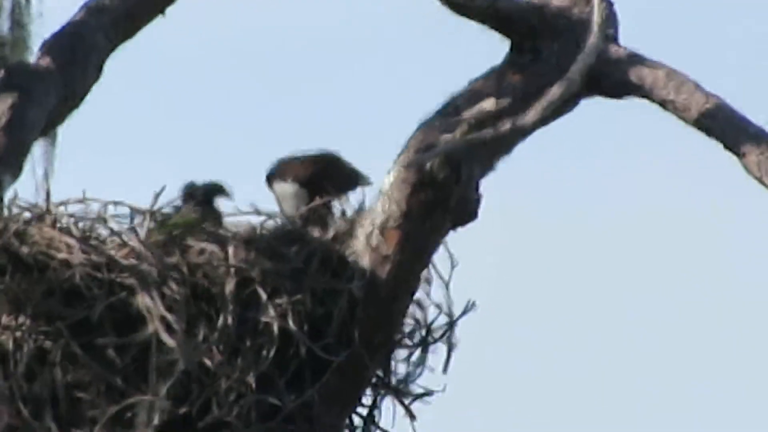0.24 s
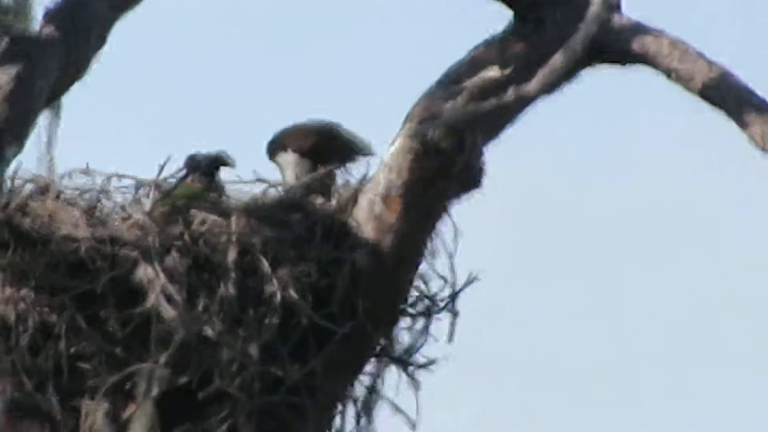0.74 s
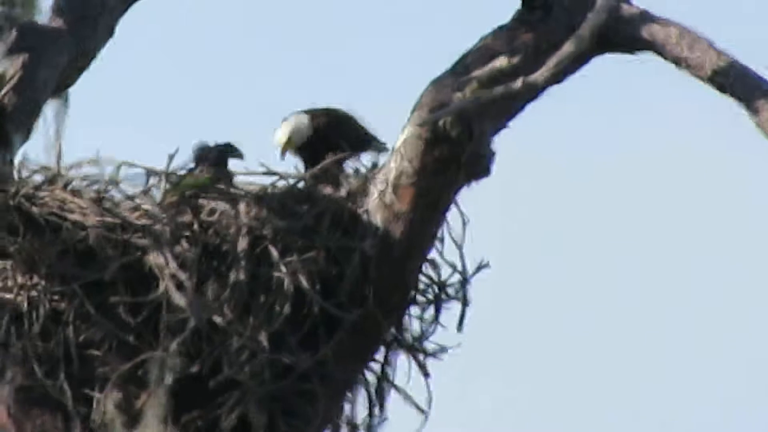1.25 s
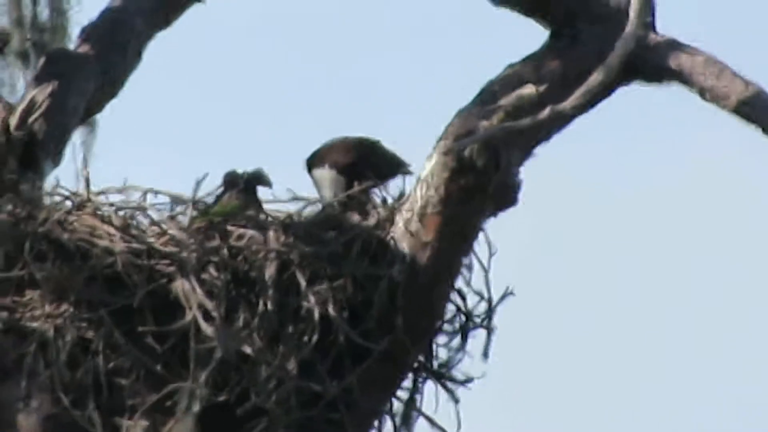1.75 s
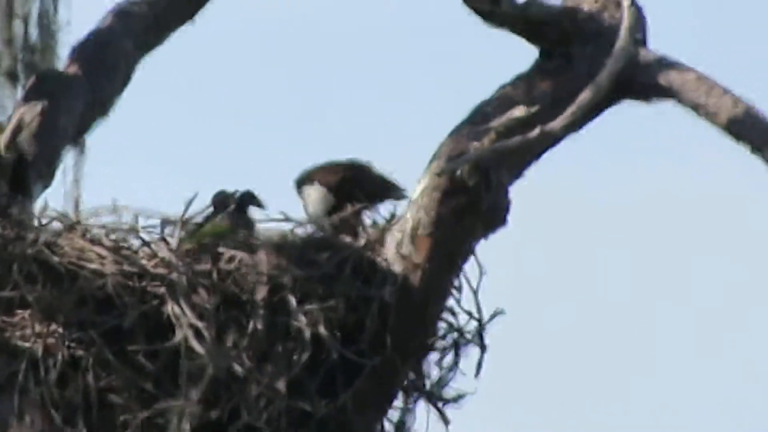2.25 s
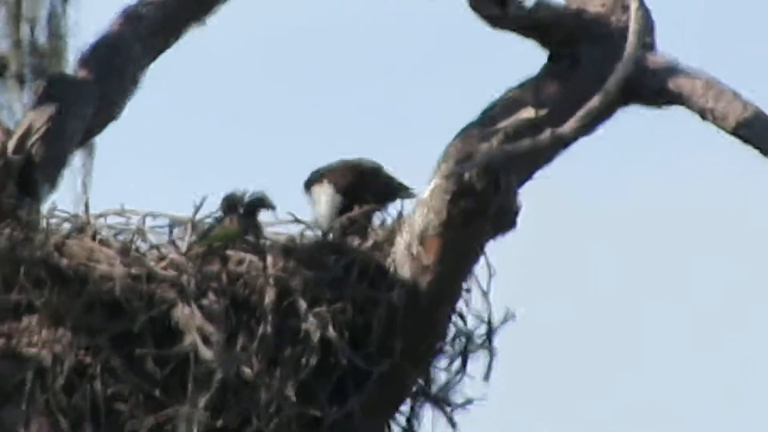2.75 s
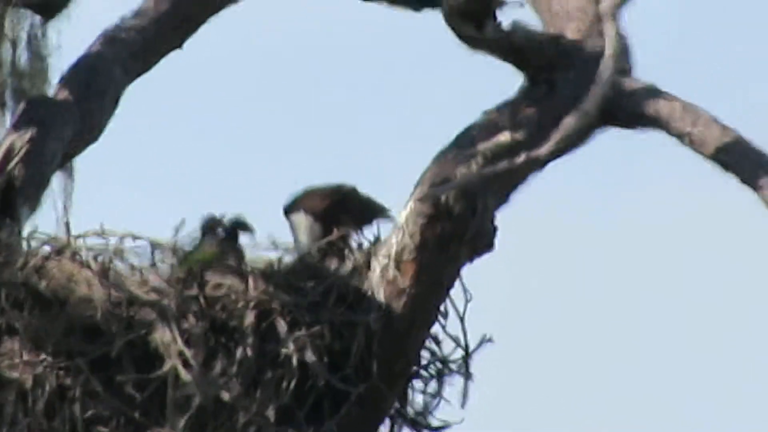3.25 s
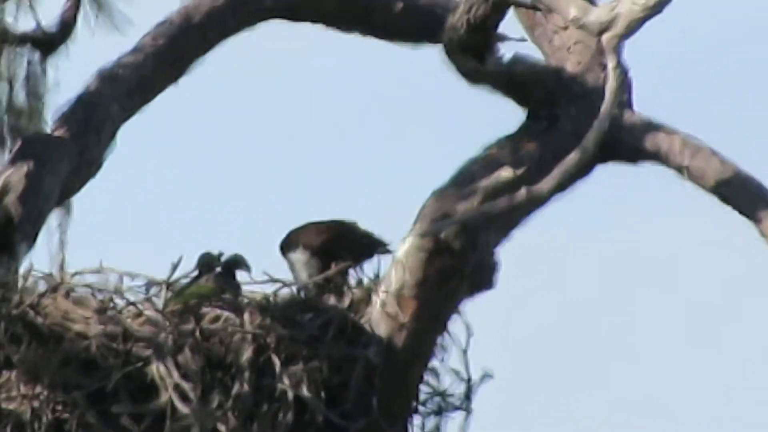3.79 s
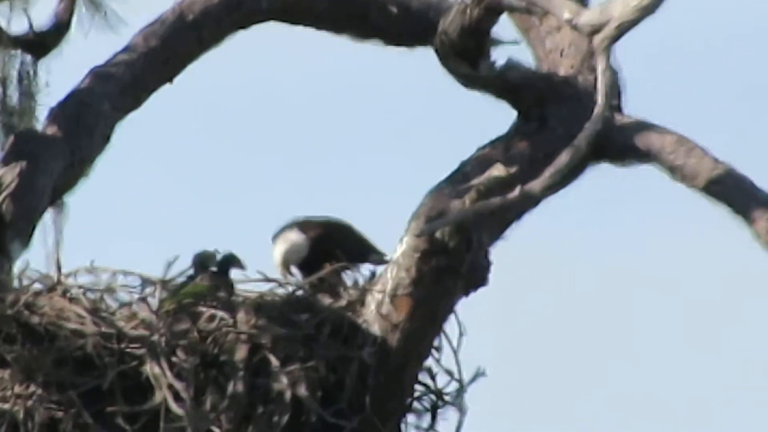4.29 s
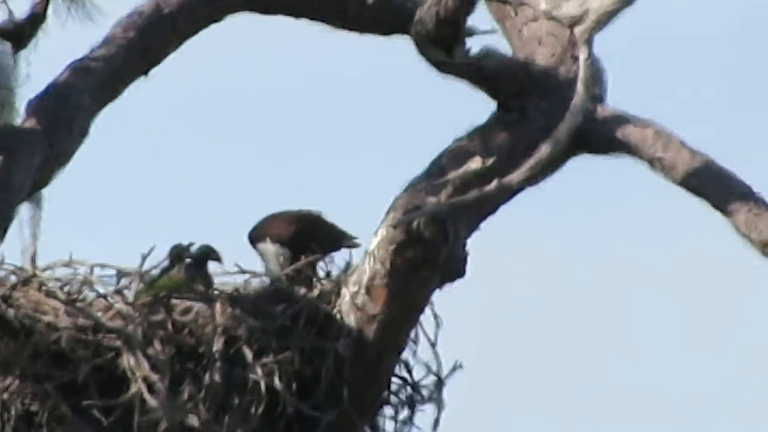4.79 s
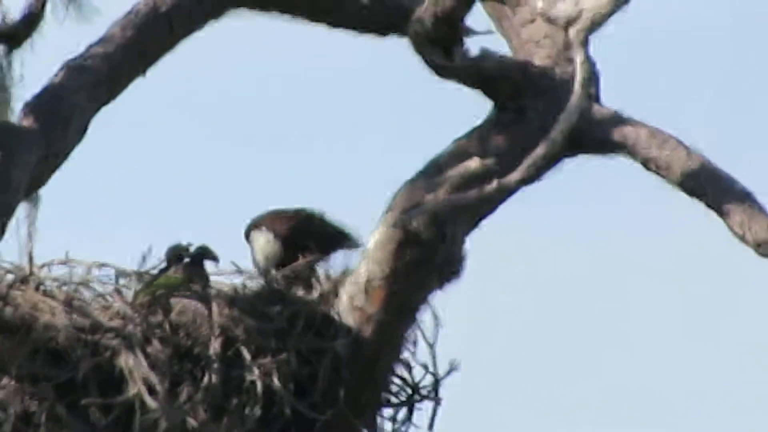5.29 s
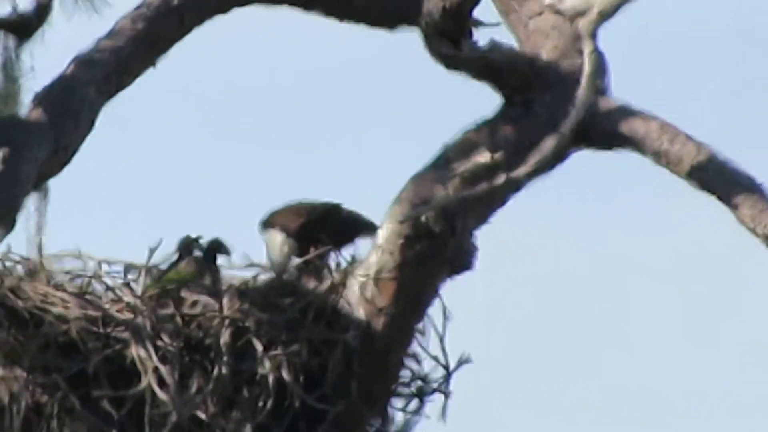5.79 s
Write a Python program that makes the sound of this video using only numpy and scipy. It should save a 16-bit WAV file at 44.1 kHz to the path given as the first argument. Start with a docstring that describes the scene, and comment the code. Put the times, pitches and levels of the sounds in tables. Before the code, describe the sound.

A bald eagle calls from its nest high in a tree, giving five short, high chittering notes, then two more after a pause. Each note cracks in sharply and drops to a soft, hoarse whimper, with a light echo from the trees. The calls sit to the right. Underneath run a far low rumble, a steady whirr, a very faint insect trill and microphone hiss.

```python
"""A bald eagle gives seven short chittering notes at its nest high in a tree, five and then two.
Each note cracks in, arches near 1.5 kHz with a strong overtone an octave up, and drops to a soft,
hoarse whimper. The bird's voice box makes the tone, its throat shapes it, and the trees scatter it back.
Under it lie a far low rumble, a steady whirr with a few ringing tones, a faint insect trill,
one tick and microphone hiss."""
import sys
import numpy as np
from scipy import signal
from scipy.fft import rfft, irfft, next_fast_len
from scipy.io import wavfile

SR = 44100
rng = np.random.default_rng(int(sys.argv[2]) if len(sys.argv) > 2 else 0)


def generate_wav(sig):
    """Save sig (samples, or channels by samples) to the path in sys.argv[1] as 16-bit PCM at SR."""
    pcm = np.round(np.clip(np.atleast_2d(sig).T, -1, 1) * 32767).astype(np.int16)
    wavfile.write(sys.argv[1], SR, pcm)


N = 265923


def gain_of(db):
    """Turns decibels into a number to multiply by."""
    return 10 ** (np.asarray(db) / 20)


def evened(x):
    """Scales a signal so its average strength (rms) is 1."""
    return x / np.sqrt(np.mean(x ** 2) + 1e-20)


def curve_at(points, hz):
    """Joins a table's points with lines, octaves evenly spaced, and looks up the value at hz."""
    point_hz, value = np.transpose(points)
    return np.interp(np.log(hz + 1), np.log(point_hz + 1), value)


def add(mix, start_s, sound):
    """Adds a sound into the mix at the given time."""
    part = mix[round(start_s * SR):][:len(sound)]
    part += sound[:len(part)]


def wander(size, rate_hz):
    """A smooth random wobble of strength about 1, no faster than about rate_hz."""
    span = next_fast_len(max(size, SR))
    hz = np.fft.rfftfreq(span, 1 / SR)
    slow = rfft(rng.standard_normal(span)) / (1 + (hz / rate_hz) ** 4)
    return evened(irfft(slow, span))[:size]


# How wide the noise sounds. Each row: frequency in Hz, unshared part over shared part in dB.
STEREO_WIDTH = [(60, -18), (92, -8), (140, -0.5), (210, 4), (330, 7.5), (500, 3.5), (760, -7), (1160, 1),
                (1760, 1.5), (2690, 2.5), (4100, 0.5), (6260, 0.5), (9560, 2.5), (14600, -4)]

def stereo_noise(shape, lean_db):
    """Noise with the given tone colour, partly shared by both ears; positive lean_db moves it left."""
    hz = np.fft.rfftfreq(N, 1 / SR)
    shared, side = rfft(rng.standard_normal((2, N)))
    width = gain_of(curve_at(STEREO_WIDTH, hz))
    left = (shared + width * side) * gain_of(lean_db / 2)
    right = (shared - width * side) * gain_of(-lean_db / 2)
    return evened(irfft(np.array([left, right]) * shape / np.sqrt(1 + width ** 2), N))


# The tone colours of three steady noises. Each row: frequency in Hz, relative level in dB.
RUMBLE_COLOUR = [(15, -6), (30, -14.5), (45, -6.5), (65, -3), (85, -6), (115, -4.5), (160, -11.5),
                 (250, -12), (400, -17), (1000, -25), (3000, -57)]
WHIRR_COLOUR = [(200, -9.5), (400, -11.5), (560, 0), (780, -6.5), (1050, -8), (1500, -9), (2100, -14),
                (3200, -19.5), (5000, -33)]
HISS_COLOUR = [(500, -8), (3000, 4), (4500, 0.5), (7500, 0), (9500, -3.5), (11500, -8.5), (13000, -15),
               (14300, -41), (15000, -50)]
# Which way they lean. Each row: frequency in Hz, left over right in dB.
NOISE_LEAN = [(60, -3), (110, -1.5), (200, -1.5), (370, -1), (690, 0.5), (1270, -0.5), (2340, -0.5),
              (4300, -0.5), (7920, 0.5), (14600, -0.5)]

def background(rumble_db=-42, whirr_db=-50, hiss_db=-55, sway_db=0.6, sway_hz=3):
    """A far rumble that sways gently in level, the broad part of the whirr, and microphone hiss."""
    hz = np.fft.rfftfreq(N, 1 / SR)
    lean_db = curve_at(NOISE_LEAN, hz)
    rumble_gain = gain_of(rumble_db + sway_db * wander(N, sway_hz))
    rumble = rumble_gain * stereo_noise(gain_of(curve_at(RUMBLE_COLOUR, hz)), lean_db)
    whirr = gain_of(whirr_db) * stereo_noise(gain_of(curve_at(WHIRR_COLOUR, hz)), lean_db)
    hiss = gain_of(hiss_db) * stereo_noise(gain_of(curve_at(HISS_COLOUR, hz)), lean_db)
    return rumble + whirr + hiss


# Tones that ring in the whirr and hiss. Each row: pitch in Hz, half width in Hz, level in dB,
# left over right in dB, how strongly it follows the swells (0 is not at all).
RINGING_TONES = [(79.7, 21.4, -51.5, 5, 0), (593.4, 21, -56.5, -1.5, 0.76), (796, 53, -52, -6.5, 0),
                 (825, 16.7, -56, -7.5, 1.9), (962.5, 3.3, -61, 2, 0.98), (1116, 42, -60.5, 2, 0),
                 (2860, 56, -72.5, -2, 0.43), (14400, 120, -91, 2, 0)]
# Brief swells of the whirr. Each row: time in seconds, rise in dB for a tone that follows at 1.
WHIRR_SWELLS = [(.25, 3.5), (1.96, 5.5), (2.12, 3), (3.33, 5.5), (4.57, 7.5), (5.17, 4.5), (5.64, 5)]

def ringing_tones(waver_db=-0.75, waver_hz=3, swell_half_s=0.029):
    """Narrow resonances give the whirr its fuzzy, wavering tones."""
    t, hz = np.arange(N) / SR, np.fft.rfftfreq(N, 1 / SR)
    swell_db = sum(rise_db * np.exp(-((t - at_s) / swell_half_s) ** 2) for at_s, rise_db in WHIRR_SWELLS)
    swell_db -= swell_db.mean()
    out = np.zeros((2, N))
    for centre_hz, half_width_hz, db, lean_db, follow in RINGING_TONES:
        band = 1 / (1 + ((hz - centre_hz) / half_width_hz) ** 2)
        level_db = db + follow * swell_db + waver_db * wander(N, waver_hz)
        out += gain_of(level_db) * stereo_noise(band, lean_db)
    return out


# A far insect's bursts of song. Each row: start in seconds, length in seconds.
INSECT_BURSTS = [(0, .4), (.64, .86), (1.98, 0.64), (3.02, .62), (4.04, 0.6), (5.02, .65)]

def insect(centre_hz=8780, half_width_hz=300, level_db=-68, stroke_hz=49.7, fade_s=0.1):
    """A faint, high trill on the left that pulses with every stroke of the wings."""
    t, hz = np.arange(N) / SR, np.fft.rfftfreq(N, 1 / SR)
    bursts = sum(np.clip(np.minimum(t - start, start + length - t) / fade_s + 0.5, 0, 1)
                 for start, length in INSECT_BURSTS)
    strokes = evened(np.exp(np.cos(2 * np.pi * stroke_hz * t)))
    band = 1 / (1 + ((hz - centre_hz) / half_width_hz) ** 2)
    return gain_of(level_db) * bursts * strokes * stereo_noise(band, lean_db=6)


def tick(start_s=0.757, burst_db=-41, decay_s=0.0006, low_cut_hz=7000):
    """One faint, dry tick: a tiny burst of noise with only its treble kept."""
    t = np.arange(0, 10 * decay_s, 1 / SR)
    out = np.zeros(N)
    add(out, start_s, gain_of(burst_db) * rng.standard_normal(len(t)) * np.exp(-t / decay_s))
    return signal.lfilter(*signal.butter(2, low_cut_hz, "high", fs=SR), out)


# Echoes off nearby limbs and the ground. Each row: delay in seconds, left gain, right gain.
NEAR_ECHOES = [(0.0125, 0.2, 0.28), (0.023, 0.18, 0.047), (.033, -.07, .08), (.056, 0.044, 0.11)]

def trees(sound, die_away_s=0.96, scatter_db=-12, rise_s=0.0042, dull_hz=3400, echoes_per_s=2500):
    """A few near echoes and a thin scatter from the trees, whose leaves soak up treble."""
    t = np.arange(SR) / SR
    echoes = rng.standard_normal((2, SR)) * (rng.random((2, SR)) < echoes_per_s / SR)
    echoes *= gain_of(-60 * t / die_away_s) * (1 - np.exp(-t / rise_s))
    echoes *= gain_of(scatter_db) / np.linalg.norm(echoes, axis=1, keepdims=True)
    echoes = signal.lfilter(*signal.butter(2, dull_hz, fs=SR), echoes)
    for delay_s, left, right in NEAR_ECHOES:
        echoes[:, round(delay_s * SR)] += left, right
    return signal.fftconvolve(sound[None], echoes, axes=1)[:, :N]


def step(x):
    """A smooth step from 0 to 1 around x = 0."""
    return 0.5 + 0.5 * np.tanh(x / 2)


LEAD_S, RISE_DB, FALL_S = 0.02, 20.5, 0.014  # a note swells up to its peak, then dies away
CRACK_ROUGH, CLIMB_HZ_PER_S, SNAP_S = 0.78, 14300, 0.001  # it starts hoarse, climbs, snaps to its pitch
ARCH_AT_S, ARCH_HALF_S = 0.0051, 0.0058  # the pitch arches just after the peak
DROP_S = 0.0026  # how quickly the voice drops to the whimper
WHIMPER_ROUGH, SAG_HZ_PER_S, RELEASE_S = 0.58, 2100, 0.031  # the whimper is hoarse, sags and fades

def note_shape(pitch_hz, peak_db, body_rough, crack_hz, crack_s, arch,
               drop_s, whimper_hz, whimper_db, end_s):
    """Time from the peak, pitch, level and roughness as a note cracks in, arches and drops."""
    t = np.arange(-LEAD_S, end_s, 1 / SR)
    in_crack = step(-(t + crack_s) / SNAP_S)
    in_whimper = step((t - drop_s) / DROP_S)
    hz = pitch_hz * (1 + arch * np.exp(-((t - ARCH_AT_S) / ARCH_HALF_S) ** 2))
    hz += in_crack * (crack_hz + CLIMB_HZ_PER_S * (t + crack_s) - hz)
    hz += in_whimper * (whimper_hz - SAG_HZ_PER_S * (t - (drop_s + end_s) / 2) - hz)
    rise = gain_of(-RISE_DB * (t / LEAD_S) ** 2)
    fall = np.exp(-(t / FALL_S) ** 2)
    cry = gain_of(peak_db) * np.where(t < 0, rise, fall)
    whimper = gain_of(whimper_db) * in_whimper * np.minimum((end_s - t) / RELEASE_S, 1)
    rough = body_rough + (CRACK_ROUGH - body_rough) * in_crack + (WHIMPER_ROUGH - body_rough) * in_whimper
    return t, hz, 20 * np.log10(cry + whimper + 1e-9), np.clip(rough, 0, 1)


# How the throat and beak colour the voice. Each row: frequency in Hz, boost or cut in dB.
THROAT_COLOUR = [(800, -28), (1100, 5.5), (1500, -10), (2000, 18), (2450, -7), (2900, 2.5), (3400, 10),
                 (4350, -9.5), (5000, -10.5), (5900, -19.5), (7400, -25.5), (9000, -35), (13000, -34)]
# The airy rasp in the rough parts. Each row: frequency in Hz, relative level in dB.
RASP_COLOUR = [(600, -55), (1200, 6), (2200, -6.5), (3000, 5), (4300, -4.5), (5500, -15), (7300, -11),
               (12000, -42)]

def eagle_note(row, jitter=0.087, jitter_hz=500, flutter=0.68, flutter_hz=450,
               press_s=0.066, firm_db=-35, mellow=1.6):
    """The voice box sings a tone with overtones through the throat; roughness shakes it and adds rasp."""
    pitch_hz, peak_db, body_rough, crack_hz, crack_s, arch, press_db, *whimper = row
    t, hz, level_db, rough = note_shape(pitch_hz, peak_db, body_rough, crack_hz, crack_s, arch, *whimper)
    cycles = np.cumsum(hz * (1 + jitter * rough * wander(len(t), jitter_hz))) / SR
    harmonics = np.arange(1, 9)[:, None]
    # Pressing at the start tilts the harmonics above the second; they fade as the voice goes slack.
    pressed_db = press_db * np.exp(-((t - t[0]) / press_s) ** 2)
    slack_db = np.maximum(firm_db - level_db, 0) * step(t / DROP_S)
    tilt_db = (pressed_db - mellow * slack_db) * np.log2(np.maximum(harmonics / 2, 1))
    thin_db = pressed_db * (harmonics == 1)  # a brighter start also thins the lowest harmonic
    strengths = gain_of(curve_at(THROAT_COLOUR, harmonics * hz) + tilt_db - thin_db)
    strengths /= np.sqrt((strengths ** 2).sum(0) / 2)
    tone = (strengths * np.sin(2 * np.pi * harmonics * cycles)).sum(0)
    # The voice box's membrane beats unevenly, which makes every harmonic fuzzy.
    beat = 1 + flutter * rough * wander(len(t), flutter_hz)
    rasp_shape = gain_of(curve_at(RASP_COLOUR, np.fft.rfftfreq(N, 1 / SR)))
    rasp = evened(irfft(rfft(rng.standard_normal(N)) * rasp_shape, N))[:len(t)]
    voice = (tone * beat + rough * rasp) / np.sqrt(1 + (flutter ** 2 + 1) * rough ** 2)
    return gain_of(level_db) * voice * signal.windows.tukey(len(t), 0.05)


# The eagle's notes, with levels at the bird. Each row: time of the peak in seconds, pitch in Hz,
# peak level in dB, roughness from 0 to 1, top pitch of the crack in Hz, end of the crack in seconds
# before the peak, arch as a share of the pitch, starting brightness in dB per octave, drop in seconds
# after the peak, whimper pitch in Hz, whimper level in dB, end in seconds after the peak.
EAGLE_NOTES = [ (1.024, 1430, -35, .12, 1544, 0.011, 0.078, -1, 0.017, 990, -53, 0.1),
               (1.387, 1640, -35, 0.19, 1794, 0.0068, 0, 1, 0.018, 1048, -49.5, 0.087),
               (1.723, 1429, -37, 0.2, 1512, 0.0126, 0.046, 0.5, 0.016, 980, -53, 0.089),
               (2.030, 1484, -38, 0.47, 1742, 0.0045, 0.038, -2, 0.017, 962, -55.5, 0.092),
               (2.349, 1406, -39.5, 0.32, 1717, 0.0023, 0.0032, -1, .018, 967, -54.5, 0.089),
               (4.054, 1433, -38.5, .06, 1530, .009, 0.019, 5.5, 0.015, 1016, -51.5, 0.085),
               (4.376, 1408, -38.5, 0.11, 1606, .012, 0.08, 0, 0.014, 913, -51, 0.083)]

def eagle(left_db=-5.5, right_db=3.0):
    """The eagle's seven notes arrive louder on the right, followed by their echoes from the trees."""
    calls = np.zeros(N)
    for peak_s, *row in EAGLE_NOTES:
        add(calls, peak_s - LEAD_S, eagle_note(row))
    return calls * gain_of([[left_db], [right_db]]) + trees(calls)


def scene():
    """The eagle over the steady background."""
    return eagle() + background() + ringing_tones() + insect() + tick()


# Narrow bands the microphone picks up poorly. Each row: frequency in Hz, width in Hz, depth from 0 to 1.
MICROPHONE_DIPS = [(3960, 320, 1), (7950, 150, 0.95)]

def record(dry, top_hz=14900):
    """The microphone dips two narrow bands and cuts the highest treble."""
    for hz, width_hz, depth in MICROPHONE_DIPS:
        dipped = signal.lfilter(*signal.iirnotch(hz, hz / width_hz, SR), dry)
        dry = dry + depth * (dipped - dry)
    treble_cut = signal.firwin(511, top_hz, window=("kaiser", 9), fs=SR)
    return signal.oaconvolve(dry, treble_cut[None], "same")


dry = scene()
out = record(dry)
generate_wav(out)
```